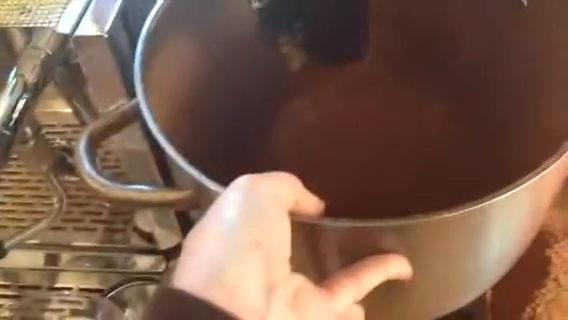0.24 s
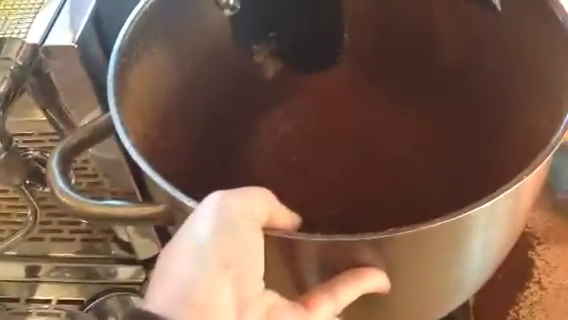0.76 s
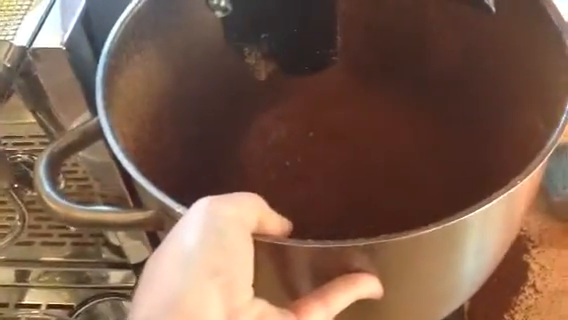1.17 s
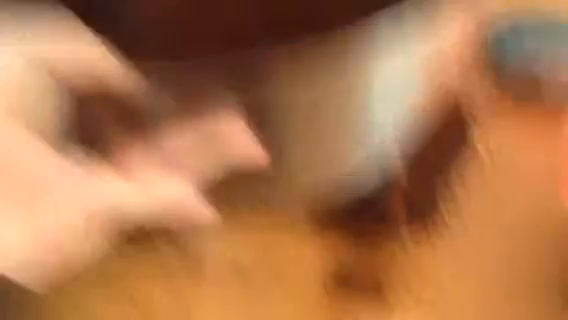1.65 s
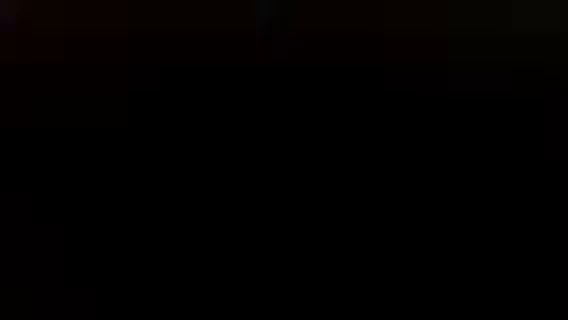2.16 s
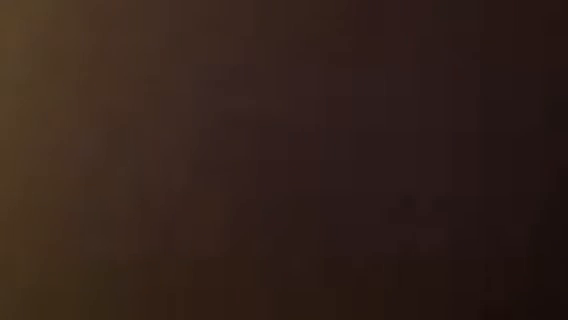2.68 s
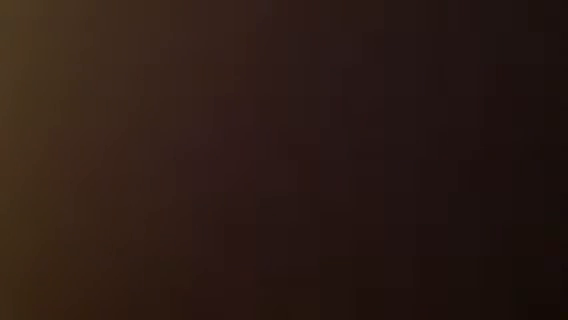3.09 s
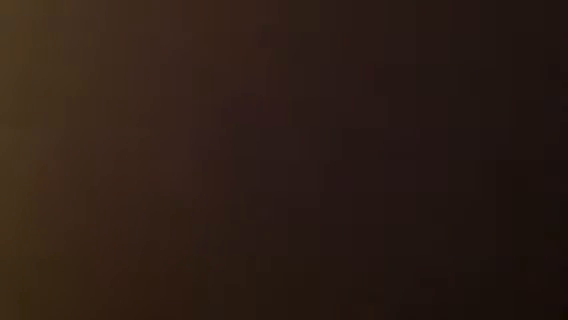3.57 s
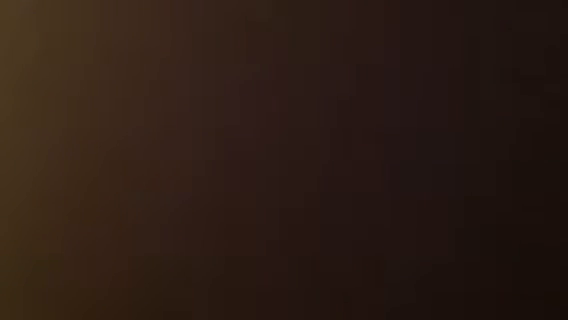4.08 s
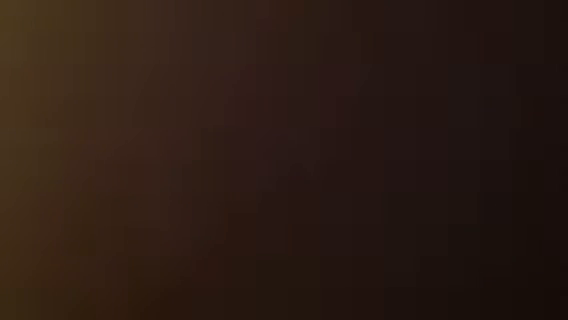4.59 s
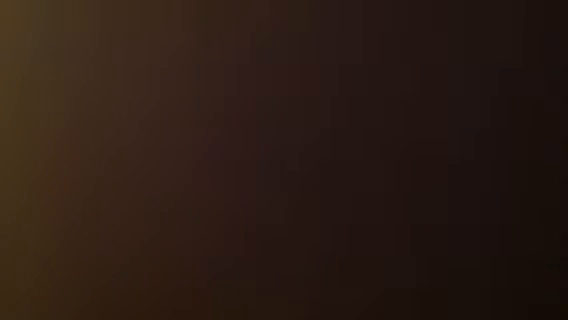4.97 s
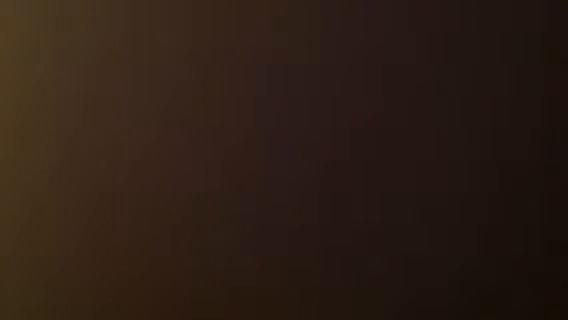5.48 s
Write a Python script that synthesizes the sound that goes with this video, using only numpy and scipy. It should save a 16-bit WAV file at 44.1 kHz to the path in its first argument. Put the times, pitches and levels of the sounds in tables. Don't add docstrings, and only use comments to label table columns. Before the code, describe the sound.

A coffee grinder whines and rasps loudly, a knock briefly dulls it, then it clicks off, coasts to a stop and leaves quiet room rumble.

```python
import sys
import numpy as np
from scipy import signal
from scipy.fft import rfft, irfft, next_fast_len
from scipy.io import wavfile
from scipy.ndimage import uniform_filter1d, minimum_filter1d, map_coordinates

SR = 44100
rng = np.random.default_rng(int(sys.argv[2]) if len(sys.argv) > 2 else 0)


def store_pcm(level_fs):
    pcm = np.round(np.clip(level_fs, -1, 1) * 32767).astype(np.int16)
    wavfile.write(sys.argv[1], SR, np.atleast_2d(pcm).T)


def boost(x):
    u = np.asarray(x, float) / 20
    return 10 ** u


N = 253134
TIME = np.arange(N) / SR
SIZE = next_fast_len(N + 8192)
FREQ = np.maximum(np.arange(SIZE // 2 + 1) * SR / SIZE, 1)
SWITCH_S, STOP_S = 3.8345, 4.098

# columns t/s, share held, share swinging, share laid down
PHONE_POSE = [
    (0, 1, 0, 0),
    (1.6, 1, 0, 0),
    (2.02, 0, 1, 0),
    (2.243, 0, 1, 0),
    (2.256, 0, 0, 1),
    (5.74, 0, 0, 1),
]


def unit(x):
    return x / np.sqrt(np.mean(x ** 2))


def curves(rows):
    s, *columns = np.transpose(rows)
    return [np.interp(TIME, s, c) for c in columns]


def smooth_twice(x, length):
    return uniform_filter1d(uniform_filter1d(x, length), length)


def walk(rate):
    k = int(SR / rate)
    steps = np.repeat(rng.standard_normal(N // k + 1), k)
    return unit(smooth_twice(steps, k)[:N])


def since(s):
    return np.maximum(TIME - s, 0)


def fall(t, t60):
    return np.exp(-np.log(1000) * t / t60)


def ring(t, hz, t60):
    return np.sin(2 * np.pi * hz * t) * fall(t, t60)


def band_noise(lo_hz, hi_hz, size):
    sos = signal.butter(2, [lo_hz, hi_hz], "bandpass", fs=SR, output="sos")
    return unit(signal.sosfilt(sos, rng.standard_normal(size)))


def colour(points):
    hz, db = np.transpose(points)
    return boost(np.interp(np.log(FREQ), np.log(hz), db))


def causal(gain):
    cepstrum = irfft(np.log(gain + 1e-9), SIZE)
    cepstrum[1:SIZE // 2] *= 2
    cepstrum[SIZE // 2 + 1:] = 0
    return np.exp(rfft(cepstrum))


def bands(x, gain, edges):
    spectrum = rfft(x, SIZE) * causal(gain)
    above = [1 / (1 + (e / FREQ) ** 16) for e in edges] + [0]
    return [unit(irfft(spectrum * (a - b), SIZE)[:N]) for a, b in zip(above, above[1:])]


def delayed(x, lag_s):
    return map_coordinates(x, [(TIME - lag_s) * SR], order=3, mode="nearest")


def patches(x, change):
    z = signal.stft(x, nperseg=1024, noverlap=768)[2]
    return signal.istft(z * change(z), nperseg=1024, noverlap=768)[1][:N]


def blur(field, bins, frames):
    return uniform_filter1d(uniform_filter1d(field, bins, axis=0), frames, axis=1)


def standing_waves(depth_db, width_hz):
    k = int(width_hz * SIZE / SR)
    return boost(depth_db * unit(smooth_twice(rng.standard_normal(len(FREQ)), k)))


def shifting_waves(z):
    field = blur(blur(rng.standard_normal(z.shape), 3, 20), 2, 20)
    return boost(1.6 * unit(field))


def ducking():
    # columns t/s, depth/dB, attack/s, recovery/s
    ducks = [
        (2.2452, -20.5, 0.0044, 0.31),
        (3.8345, -7.5, 0.0044, 0.95),
    ]
    return sum(db * (1 - np.exp(-since(s) / attack)) * np.exp(-since(s) / back)
               for s, db, attack, back in ducks)


def grind_levels():
    # columns t/s, level/dB
    bean_load = [(0, -1), (.12, -1), (.2, -1.5), (.45, 0.5), (1.0, .5), (1.5, .5), (1.68, -2), (1.8, 0),
                 (2.08, -0.9), (2.16, 1.2), (2.24, 1), (2.6, 1), (3.08, 1.5), (3.22, -1), (3.35, 0),
                 (3.75, 0), (3.83, 1)]
    held_db, swing_db, laid_db = (-27.5, -17.5, -20.5, -24), (-30.5, -17.5, -24.5, -28.5), (-28, -15.5, -24, -28)
    wobble_db = np.c_[[1.5, .4, .6, .6]]
    covered_db = np.c_[[0.5, 0.5, -2.5, 1.5]]
    coast_db_per_s = np.c_[[-2, -29, -39, -35]]
    halt_db, halt_s = np.c_[[-10.5, -10, -12, -10]], 0.0036
    ringout_t60_s = np.c_[[.6, 0.24, 0.25, .2]]

    db = np.transpose([held_db, swing_db, laid_db]) @ np.array(curves(PHONE_POSE))
    db = db + curves(bean_load)[0] + ducking()
    db = db + wobble_db * np.array([walk(29.97) for _ in wobble_db])
    db = db + covered_db * ((TIME > 2.2445) & (TIME < 2.522))
    db = db + coast_db_per_s * np.minimum(since(SWITCH_S), STOP_S - SWITCH_S)
    db = db + halt_db * (1 - np.exp(-since(STOP_S) / halt_s))
    return db - 60 * since(STOP_S) / ringout_t60_s


def housing(base, peaks, dips, base_db, top_db):
    power = (boost(base_db) * colour(base)) ** 2
    for hz, width, db in peaks:
        mode_db = db + top_db * (hz > 3300)
        power = power + boost(mode_db) ** 2 / (1 + (2 * (FREQ - hz) / width) ** 2) ** 2
    gain = np.sqrt(power) * standing_waves(1.24, 24.0)
    for hz, width, depth in dips:
        gain = gain * (1 - depth / (1 + (2 * (FREQ - hz) / width) ** 2))
    return gain


def grinder():
    grind_edges = [340, 650, 3300, 9400]
    # columns f/Hz, level/dB
    held_colour = [(180, -67), (300, -30), (439, 2.5), (631, -21.5), (907, -20), (1730, -6), (2560, -7.5),
                   (2930, -8), (4070, -16.5), (4650, -13.5), (6050, -23), (8560, -11.5), (9760, -19),
                   (12700, -15), (15500, -17)]
    swing_colour = [(180, -30), (300, -15.5), (431, -2.5), (674, -21), (1020, -18.5), (1730, 0.5),
                    (2000, -7.5), (2360, -12.5), (4280, -14), (8140, -16), (9760, -15.5), (14500, -15),
                    (15500, -20)]
    laid_colour = [(180, -55), (300, -26), (404, -3.5), (468, -12.5), (756, -20), (1300, -8.5), (1420, -5),
                   (1750, 2), (3280, -9), (3690, -10), (4350, -8.5), (8280, -13.5), (9760, -35),
                   (11900, -37.5), (15500, -38)]
    # columns f/Hz, width/Hz, level/dB
    held_modes = [(402.8, 33, -8.5), (449, 26, -7.5), (509, 19, -11.0), (537, 25, -15.0), (1410, 30, -12),
                  (1484.4, 46, -6.5), (1607, 19, -20), (1725.0, 62, -1.5), (1918, 18, -5.5),
                  (1945, 26, -13.5), (2180, 34, -18.5), (2298, 66, -5.5), (2870, 158, -8.5),
                  (3784, 76, -4.0), (4590, 130, -5.5), (4784, 240, -8.0), (5640, 300, -14),
                  (7000, 60, -6.0), (7450, 210, -17.0), (8490, 250, -8), (11100, 250, -16.0),
                  (13130, 300, -5.5)]
    swing_modes = [(450, 73, -21), (1746, 11, -0.5), (2213, 43, -5), (2365, 110, -10.5), (2845, 72, -13.5),
                   (3670, 180, -3), (7130, 230, -2.5), (8220, 550, -3.0)]
    laid_modes = [(405, 50, -9.5), (469.4, 56, -8.0), (1413, 23, -4), (1529, 45, -8), (1660, 23, -10.0),
                  (1730, 41, -0.5), (1890, 14, 0.0), (1930, 25, -2.5), (2144, 33, -3.5), (2102, 20, -3),
                  (2230, 24, -8.0), (2376, 62, -9), (2876, 78, -8.5), (3010, 78, -14.5), (3703, 133, 4.5),
                  (4250, 65, -31), (5320, 290, -5), (7180, 230, 0.5), (8140, 190, -8)]
    # columns f/Hz, width/Hz, depth/0-1
    held_cancel = [(630, 80, .4), (2620, 100, .5), (4100, 250, .5), (9500, 250, .5), (13600, 350, .64),
                   (15000, 200, .55)]
    laid_cancel = [(2000, 50, .5), (9500, 200, .4), (10000, 300, .5), (12500, 250, .55), (13500, 200, .45),
                   (14100, 300, .6), (14900, 300, .55)]

    cracks = (rng.random(N) < .12) * rng.standard_normal(N) * boost(2.5 * rng.exponential(size=N))
    feed = boost(.5 * walk(29.27) + 1.0 * walk(70))
    drive = feed * (rng.standard_normal(N) + boost(-5) * unit(cracks))
    gains = [housing(held_colour, held_modes, held_cancel, base_db=-9, top_db=-12),
             housing(swing_colour, swing_modes, [], base_db=-7, top_db=-11),
             housing(laid_colour, laid_modes, laid_cancel, base_db=-9, top_db=-13)]
    places = [bands(drive, gain, grind_edges) for gain in gains]
    shares = np.sqrt(curves(PHONE_POSE))
    out = 0
    for k, db in enumerate(grind_levels()):
        heard = sum(share * place[k] for share, place in zip(shares, places))
        swell = smooth_twice(heard ** 2, int(0.058 * SR))
        out = out + boost(db) * heard * swell ** -.3
    return out


def kitchen():
    # columns f/Hz, level/dB
    room_colour = [(15, -61), (25, -48), (148, -4), (267, 2.5), (469, -3.5), (552, -10), (614, -7),
                   (826, -10), (1110, -23), (1270, -24), (1950, -31), (2420, -32), (4040, -35.5),
                   (8810, -52.5), (15500, -60.5)]
    room_edges = [20, 340, 1000, 5000]
    level_db, creep_db = (-47, -51, -57, -67.5), (3.6, 6.2, 4.3, 0.3)
    creep_from_s, creep_tau_s = 4.3, .55
    duck_share, motor_rumble_db = 0.45, 2.5

    parts = bands(rng.standard_normal(N), colour(room_colour), room_edges)
    common = duck_share * ducking() + motor_rumble_db * np.exp(-since(SWITCH_S) / 0.043)
    crept = 1 - np.exp(-since(creep_from_s) / creep_tau_s)
    out = 0
    for db, creep, part in zip(level_db, creep_db, parts):
        out = out + boost(db + common + creep * crept + 2.0 * walk(13)) * part
    return out


def knocks():
    # columns t/s, crack/dB, crack pitch f/Hz, body/dB, tick/dB
    blows = [(2.243, -23, 2350, -18, -40), (2.519, -20, 2300, -20, -17), (2.527, -17, 2300, -15, -13),
             (3.8345, -6, 4060, -30, -7), (4.0225, -12, 5960, -36, -22.5),
             (5.1168, -44.5, 4480, -54, -50.5), (5.12, -25.5, 1500, -31, -58),
             (5.1216, -31, 3330, -18, -44), (5.3034, -29, 3190, -30, -43), (5.4553, -30, 3700, -42, -43),
             (5.5605, -41, 3100, -55, -60), (5.5665, -42, 4500, -55, -45), (5.617, -31.5, 3500, -33, -42)]
    # columns f/Hz, level/dB, t60/s
    ware = [
        (1267, 3.5, 0.017),
        (1500, -1, 0.024),
        (2500, -8, 0.031),
        (4240, -1, 0.0093),
    ]
    # columns t/s, level/dB, f/Hz, t60/s
    thuds = [
        (2.2427, -16.5, 305, 0.027),
        (2.5193, -15, 266, 0.022),
        (2.53, -8.5, 310, 0.012),
        (5.121, -35, 201, 0.36),
        (5.121, -24, 345, 0.063),
    ]
    near_fade_s, far_fade_s = 0.016, 0.03
    echo_s, echo_db = .0052, -7

    out = np.zeros(N + SR)
    t = np.arange(SR // 4) / SR
    n = len(t)
    rise = 1 - np.exp(-t / .0005)
    tail = fall(t, 0.38)
    for s, crack_db, hz, body_db, tick_db in blows:
        fade = fall(t, near_fade_s if s < STOP_S else far_fade_s)
        crack = ring(t, hz, .012) + band_noise(0.56 * hz, 1.25 * hz, n) * boost(-6.5) * fade
        crack = crack + boost(-23) * ring(t, 3235, .12)
        crack = crack + band_noise(910, 4900, n) * boost(-20) * tail
        body = sum(boost(db) * ring(t, f * (1 + 0.022 * rng.standard_normal()), t60) for f, db, t60 in ware) / 2
        body = body + band_noise(400, 3500, n) * boost(-9.0) * fade
        tick = band_noise(6000, 16000, n) * (fade + boost(-23) * tail) / 2
        blow = rise * (boost(crack_db) * crack + boost(body_db) * body + boost(tick_db) * tick)
        wall_db = echo_db - 10 * (s < 4)
        for lag, db in [(0, 0), (echo_s, wall_db)]:
            i = int((s + lag) * SR)
            out[i:i + n] += boost(db) * blow
    for s, db, hz, t60 in thuds:
        i = int(s * SR)
        out[i:i + n] -= boost(db) * ring(t, hz, t60) * (1 - np.exp(-t / 0.00069))
    no_bass = signal.butter(2, 110, "highpass", fs=SR, output="sos")
    return signal.sosfilt(no_bass, out[:N])


def rustles():
    brushes = [
        (4.335, .04, -64),
        (4.505, .1, -63),
        (4.86, .05, -69.5),
        (5.0, .06, -64),
    ]
    swells = sum(boost(db) * np.exp(-(2 * (TIME - s) / length) ** 4) for s, length, db in brushes)
    return band_noise(2900, 8500, N) * boost(1.5 * walk(120)) * swells


def scene():
    grind = patches(delayed(grinder(), .0001 * walk(4.1)), shifting_waves)
    return np.tile(boost(0.21) * grind + kitchen() + rustles() + knocks(), (2, 1))


def masked(z):
    # columns f/Hz, level/dB
    mask_limit = [
        (3500, -11),
        (8500, -11),
        (10000, -7),
        (13000, -5.5),
        (15500, -4.6),
    ]
    power = np.abs(z) ** 2
    hz = np.arange(len(z)) * SR / 1024
    limit = boost(2 * np.interp(hz, *np.transpose(mask_limit), left=-99))[:, None]
    weak = blur(power, 5, 6) < limit * blur(power, 44, 6)
    return 1 - .97 * blur(1. * weak, 2, 3)


def band_limit(x):
    return signal.sosfilt(signal.butter(12, 15690, fs=SR, output="sos"), x)


def record(dry):
    mic_low_hz, top_hz, ceiling = 65, 15330, .7
    x = signal.sosfilt(signal.butter(2, mic_low_hz, "highpass", fs=SR, output="sos"), dry[0])
    hold = int(.002 * SR)
    limiter = minimum_filter1d(ceiling / np.maximum(np.abs(x), ceiling), 2 * hold)
    x = patches(x * uniform_filter1d(limiter, hold), masked)
    x = signal.sosfilt(signal.ellip(10, .3, 70, top_hz, fs=SR, output="sos"), x)
    return band_limit(np.tile(x, (2, 1)))


dry = scene()
out = record(dry)
store_pcm(out)
```